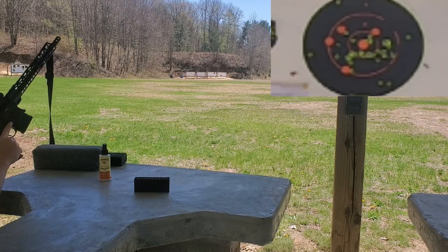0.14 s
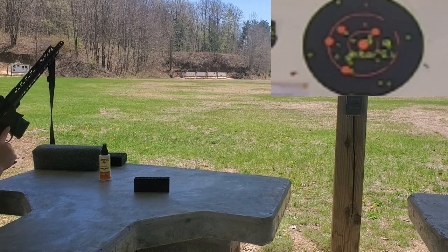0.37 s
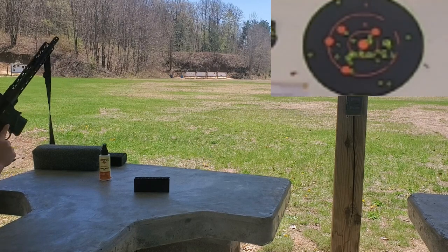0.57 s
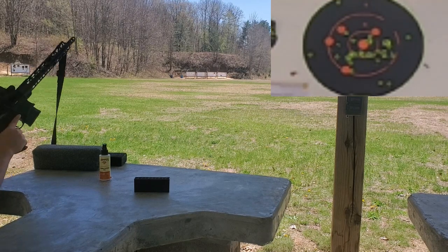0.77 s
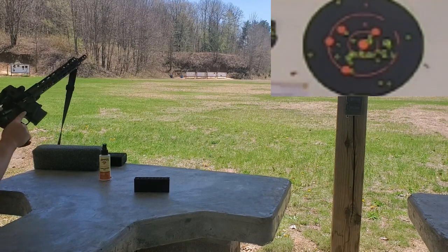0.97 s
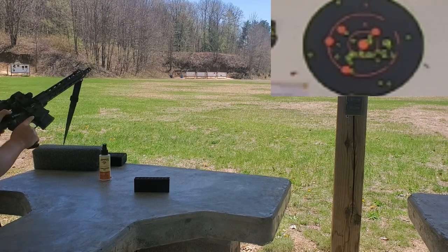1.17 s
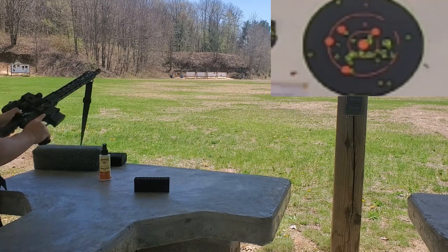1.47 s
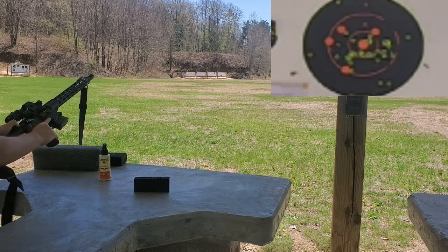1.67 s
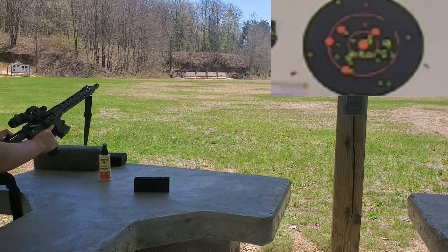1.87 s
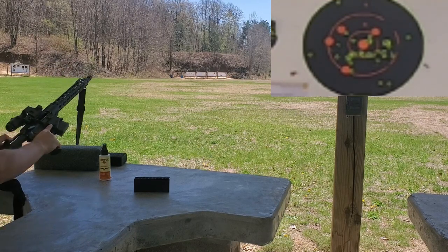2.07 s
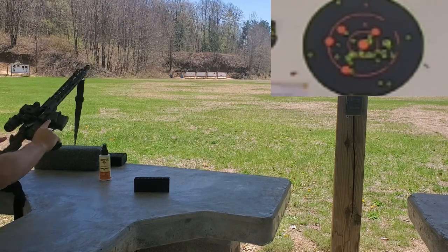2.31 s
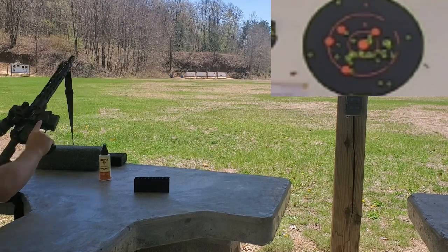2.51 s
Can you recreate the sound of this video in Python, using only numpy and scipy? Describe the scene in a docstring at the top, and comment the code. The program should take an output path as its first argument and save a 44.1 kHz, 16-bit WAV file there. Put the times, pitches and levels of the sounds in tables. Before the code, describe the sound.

A rifle is handled close by, outdoors, with a light click at the start and another at 0.3 seconds as the magazine slips out. From 1.6 seconds the handle scrapes back, clicks and hits its stop with a loud metal clack at 1.8. The bolt slams shut in a loud rattling clack around 2.4 seconds. Faint wind buffeting and cloth rustle run underneath.

```python
"""A rifle is handled at a roofed outdoor bench, close to a small stereo microphone pair: two light
clicks, the magazine slips out, the charging handle slides, unlatches and hits its stop, then the bolt
slams home in several blows. Each impact excites damped modes of the hollow body and the steel parts;
sliding friction gives a scrape, and the roof answers briefly. Wind thumps on both microphone ports,
cloth and sling rustle, and something far off hoots twice over a faint hiss."""
import sys
import numpy as np
from scipy import signal
from scipy.fft import rfft, irfft, next_fast_len
from scipy.io import wavfile
from scipy.ndimage import uniform_filter1d, map_coordinates

SR = 44100
rng = np.random.default_rng(int(sys.argv[2]) if len(sys.argv) > 2 else 0)


def transcribe(signal):
    """Save signal, clipped to [-1, 1], as a 16-bit WAV file at the path in sys.argv[1]."""
    frames = np.atleast_2d(signal).T
    limited = np.clip(frames, -1, 1)
    pcm = np.round(limited * 32767).astype(np.int16)
    wavfile.write(sys.argv[1], SR, pcm)


N = 116865
LEAD_S = .000195  # the rifle's sound reaches the left port first
SIDE = np.array([[.5], [-.5]])  # splits a level difference between left and right


def contacts():
    """Impact excitation: each metal contact rings the rifle; the hardest also thud in the stock."""
    # Contacts: t/s, ring time over that of the free ring, then level/dB in seven bands
    # (low and upper body; low, mid and high steel; low and top treble)
    impacts = [(0.0128, 1.21, -66, -41, -48.5, -43.5, -46.5, -47.5, -56),
               (0.3012, 0.65, -62, -46, -52, -33.5, -43, -39, -53),
               (0.3028, 0.74, -52, -37, -33.5, -32.5, -42, -45.5, -50),
               (0.74, 0.87, -76, -74, -64, -59, -66, -56, -64),
               (1.593, .6, -63, -42, -58, -49, -48, -47, -54),
               (1.705, 0.53, -35, -24, -20.5, -10.5, -17, -19, -20),
               (1.708, 0.58, -35, -50, -20, -7, -22, -34, -18),
               (1.776, 0.92, -32, -28, -36, -26, -44, -33, -37),
               (1.7853, 1.15, -9.5, -10, -13, -17.5, -25.5, -22.5, -15.5),
               (1.791, 0.34, -46, -7.5, -8, -30, -21, -14, -12),
               (1.797, 0.34, -27, -20, -17, -22, -42, -34, -32),
               (1.8065, 0.3, -11, -18, -19.5, -16.5, -24.5, -27, -35),
               (1.8109, 0.37, -8.5, -16, -26, -41, -28, -39, -40),
               (1.830, 0.86, -21.5, -37, -26, -51, -48, -53, -48),
               (2.326, 1.5, -42.5, -37, -47.5, -34.5, -59.5, -42, -42),
               (2.3341, 1.24, -39, -30, -30, -14, -22, -20.5, -25),
               (2.3386, 0.52, -26.5, -5, -21.5, -15.5, -17, -16, -29.5),
               (2.3422, 0.46, -23, -12, -9, -20, -24.5, -24.5, -26),
               (2.3485, 1.4, -21, -20, -27.5, -33.5, -28, -41, -35),
               (2.3561, 1.1, -15.5, -16.5, -19.5, -14.5, -24, -18, -13),
               (2.3602, 1.1, -17.5, -7, -12.5, -15.5, -16, -20.5, -21),
               (2.365, 0.57, -18, -11, -13, -16, -14, -15.5, -27),
               (2.374, 1.3, -26, -28, -24.5, -13, -11.5, -15, -16.5),
               (2.3796, 0.47, -16.5, -15.5, -11.5, -8, -9.5, -9.5, -10.5),
               (2.385, 0.55, -20.5, -17, -16, -21.5, -15, -6, -17),
               (2.392, 0.53, -20, -29, -27.5, -24.5, -15, -14.5, -24.5),
               (2.405, 0.99, -25.5, -20, -19, -35, -18.5, -24, -18.5),
               (2.429, 1.12, -30, -33, -25, -38.5, -34.5, -24.5, -32.5),
               (2.463, 0.51, -28.5, -30, -26, -26.5, -37, -42.5, -41),
               (2.489, 0.81, -38, -40, -40, -49, -45, -53, -52)]
    # Blows taken by the stock: t/s, level/dB
    thuds = [(1.808, -11), (2.378, -10.5)]
    thud_hz, thud_t60_s, thud_rise_s = 231.7, .05, .00043
    out, t = np.zeros((2, N + SR)), np.arange(SR // 8) / SR
    for start, ring_share, *levels_db in impacts:
        hit = sum(amp(db) * blow(band, t, ring_share) for band, db in enumerate(levels_db))
        lag_s = LEAD_S + .000018 * rng.standard_normal()  # parts sit at different angles
        for port, delay_s in zip(out, (0, lag_s)):
            port[round((start + delay_s) * SR):][:len(t)] += hit
    for start, db in thuds:
        envelope = amp(db - 60 * t / thud_t60_s) * (1 - np.exp(-t / thud_rise_s))
        out[:, round(start * SR):][:, :len(t)] += envelope * np.sin(2 * np.pi * thud_hz * t)
    return out[:, :N]


def blow(band, t, ring_share):
    """Modal superposition: one band of an impact is a sum of damped sinusoids plus a noise burst."""
    # Modes, from the hollow receiver up to the small steel parts: f/Hz, relative level/dB, T60/s
    modes = [(530, -9, .045), (585, 0, .055), (700, -3, .045), (790, -4, .04), (900, -2, .045),
             (1090, -2, .035), (1335, 0, .045), (1650, -4, .04), (1780, -5, .04), (1910, -3, .045),
             (1955, -3, .045), (2190, -4, .04), (2410, -4, .04), (2750, -4, .04), (3000, -4, .03),
             (3210, -1, .035), (3435, 1, .04), (3815, 0, .04), (4400, -3, .025), (4705, -6, .035),
             (5025, -4, .035), (5450, -2, .04), (5700, -2, .04), (6110, -4, .045), (6600, -3, .04),
             (8700, -4, .03), (9015, -2, .035), (9800, -2, .025), (10300, -3, .025), (11400, -7, .025),
             (12740, -2, .025), (13400, -3, .025), (14800, -6, .02)]
    # Edges of the seven bands: f/Hz
    band_edges = [490, 650, 1500, 2870, 4530, 7500, 11000, 15800]
    # Noise burst in each band: relative level/dB
    crack_db = [-9, -5, 1, -1, 2, 3, 4]
    # Its decay in each band, before scaling by ring_share: T60/s
    crack_t60 = [.025, .02, .022, .02, .022, .022, .022]
    scatter_db, detune, phase_step, attack_s = 2, .003, .03, .0006
    low, high = band_edges[band:band + 2]
    hz, db, t60 = np.transpose([m for m in modes if low < m[0] <= high])[:, :, None]
    fall = 60 * t / np.clip(ring_share, .2, 2)
    level_draw, pitch_draw = rng.standard_normal((2, len(hz), 1))
    drift = phase_step * np.cumsum(rng.standard_normal((len(hz), len(t))), 1) * np.sqrt(hz / 5000)
    phase = 2 * np.pi * hz * (1 + detune * pitch_draw) * t + drift
    envelopes = amp(db + scatter_db * level_draw - fall / t60)
    ring = (envelopes * np.sin(phase)).sum(0) / np.linalg.norm(amp(db))
    bandpass = signal.butter(4, [low, high], "band", fs=SR, output="sos")
    noise = unit(signal.sosfilt(bandpass, rng.standard_normal(len(t))))
    crack = amp(crack_db[band] - fall / crack_t60[band]) * noise
    return (ring + crack) * (1 - np.exp(-t / attack_s))


def slide():
    """Sliding friction: a part moving in its track gives grainy noise, later at the right port."""
    # Travel of the magazine, then the handle: t/s, level/dB
    travel = [(.305, -86), (.312, -51.5), (.35, -53), (.43, -76), (.5, -110), (1.575, -110), (1.594, -55),
              (1.62, -42.5), (1.645, -45.5), (1.67, -52), (1.7, -48.5), (1.712, -37.5), (1.74, -46.5),
              (1.785, -35), (1.795, -110)]
    # Friction spectrum: f/Hz, relative density level/dB
    spectrum = [(350, -35), (600, 8), (1420, -14.5), (1630, -2), (2450, -3.5), (3650, -5), (7740, -5.5),
                (13600, -12), (15800, -18.5)]
    level_db, = curves(travel)
    grit = amp(2.5 * wobble(300)[0]) * rush(spectrum, correlation=.8, patchy_db=1)[0]
    scrape = amp(level_db) * unit(grit)
    return np.array([scrape, np.roll(scrape, round(LEAD_S * SR))])


def roof(x):
    """Diffuse reflection from roof and benches: each block is convolved with a fresh noise tail."""
    # Reverberation time: f/Hz, T60/s
    decay = [(200, 0.65), (700, 0.19), (2000, 0.17), (5000, 0.28), (10000, 0.21), (15000, 0.17)]
    # Colour of the reflections: f/Hz, relative level/dB
    colour = [(200, -7.5), (700, -2), (2000, 4.9), (5000, 6.5), (10000, 5.5), (15000, 1)]
    block_s, delay_s, coherent_below_hz = .06, .005, 930
    out, step = np.zeros((2, N + SR)), int(block_s * SR)
    for i in range(0, N, step):
        block = x[i:i + step]
        if np.abs(block).max() > 1e-4:
            hz, t, noise = signal.stft(rng.standard_normal((2, SR // 2)), SR, nperseg=256)
            hz = hz[:, None]
            common = 1 / (1 + (hz / coherent_below_hz) ** 2)  # both ports hear much the same lows
            noise = np.sqrt(common) * noise[0] + np.sqrt(1 - common) * noise
            envelope = amp(along(colour, hz) - 60 * t / along(decay, hz))
            tail = signal.istft(noise * envelope, SR, nperseg=256)[1] / 40  # near unit energy
            wet = signal.fftconvolve(block[None], tail, axes=1)
            out[:, i + round(delay_s * SR):][:, :wet.shape[1]] += wet
    return out[:, :N]


def wind():
    """Turbulent pressure: low, lumpy buffeting, nearly uncorrelated between the ports."""
    # Gusts: t/s, relative level/dB, left over right/dB
    gusts = [(0.0, -33.5, -2), (0.04, -40, 2), (0.07, -53, 4), (0.13, -57, -23), (0.18, -49.5, -4),
             (0.22, -40, 1), (0.33, -40, -4), (0.39, -42.5, -12), (0.47, -48, -8.5), (0.6, -58, -31),
             (0.72, -34.5, 8), (0.78, -40.5, -12), (0.82, -35.5, -1), (0.87, -48, 4), (0.92, -57, -27),
             (0.98, -33, -3), (1.09, -52.5, -11), (1.16, -31.5, 7), (1.2, -41, -12), (1.23, -32.5, -2),
             (1.31, -48, -8), (1.36, -55.5, -36.5), (1.47, -69.5, -38), (1.5, -33.5, -7), (1.56, -65, -43),
             (1.63, -44.5, -21), (1.67, -47.5, 27), (1.7, -42, 26), (1.74, -46, -6.5), (1.88, -31.5, -4.5),
             (1.96, -44, -2), (1.98, -58.5, -28), (2.03, -40.5, -7), (2.07, -58, 29), (2.09, -41.5, 4),
             (2.27, -45.5, -1), (2.29, -38.5, -2), (2.41, -43, -0.5), (2.62, -53.5, 0), (2.65, -52, 5)]
    # Buffeting spectrum: f/Hz, relative density level/dB
    spectrum = [(12, -9.5), (20, -18), (43, 0), (75, -0.5), (124, -13), (221, -28), (271, -21),
                (300, -23.5), (390, -56), (660, -120)]
    level_db, pan_db = curves(gusts)
    lumps = unit(amp(.5 * wobble(21)) * rush(spectrum, correlation=.05, patchy_db=.1))
    return amp(level_db - 1.5 + pan_db * SIDE) * lumps


def rustle():
    """Fabric friction: moving cloth and sling give two bands of noise, stronger on the right."""
    # Movements: t/s, low-band level/dB, high-band level/dB
    movements = [(0, -58.5, -63.5), (.18, -68, -69), (.22, -60, -82), (.33, -60, -64), (.45, -62, -60.5),
                 (.55, -67.5, -75), (.72, -65, -93), (.78, -58, -61), (.86, -61.5, -64.5), (.91, -62, -72),
                 (.94, -56, -58.5), (1.0, -52, -64.5), (1.06, -61.5, -76), (1.16, -61, -81),
                 (1.21, -48.5, -67.5), (1.27, -51, -64), (1.37, -52, -61.5), (1.46, -56.5, -65.5),
                 (1.51, -56.5, -57), (1.57, -52, -60.5), (1.63, -52.5, -45.5), (1.7, -65, -52),
                 (1.78, -45, -60), (1.9, -48, -57), (2.0, -60.5, -62.5), (2.13, -59, -69.5),
                 (2.3, -59.5, -89), (2.55, -58.5, -60.5), (2.65, -111, -67)]
    # Low band of the cloth: f/Hz, relative density level/dB
    low_spectrum = [(88, -56), (150, -2.5), (227, -18.5), (429, -6.5), (728, -8), (833, -7), (1500, -18.5),
                    (1950, -20.5), (3300, -120)]
    # High band of the cloth: f/Hz, relative density level/dB
    high_spectrum = [(800, -30), (1300, 0), (2000, -7.5), (3000, -6.5), (3800, -15.5), (5200, -41),
                     (7000, -34.5), (12000, -120)]
    low_db, high_db = curves(movements)
    low = amp(low_db + 1.5 * wobble(40)) * rush(low_spectrum, correlation=.3, patchy_db=2)
    high = amp(high_db + 1.5 * wobble(40)) * rush(high_spectrum, correlation=.05, patchy_db=2)
    return amp(-3 * SIDE) * (low + high)


def hoots():
    """Harmonic tones: each distant hoot is a fundamental and its octave, wavering in level."""
    # Hoots: t/s, duration/s, f/Hz, fundamental level/dB, octave level/dB
    calls = [(0.92, 0.12, 600, -59, -59.5), (2.617, 0.035, 608, -55, -61)]
    rise_s, fall_s = .0092, .008
    out, t = np.zeros(N), np.arange(N) / SR
    for start, duration, hz, first_db, octave_db in calls:
        gate = np.clip((t - start) / rise_s, 0, 1) * np.clip((start + duration - t) / fall_s, 0, 1)
        phase = 2 * np.pi * hz * t
        out += gate * (amp(first_db) * np.sin(phase) + amp(octave_db) * np.sin(2 * phase))
    return amp(2.5 * wobble(60)) * out


def hiss():
    """Noise floor: a faint broadband hiss, nearly uncorrelated between the ports."""
    # Hiss spectrum: f/Hz, relative density level/dB
    spectrum = [(120, -43), (200, 3), (330, -9), (700, -10.5), (1300, -14), (2400, -19.5), (4500, -25),
                (5800, -18), (6800, -30.5), (7700, -35), (9000, -22), (10200, -15), (11500, -22.5),
                (12500, -27.5), (15000, -26), (15900, -28.5)]
    return amp(-61) * rush(spectrum, correlation=.027, patchy_db=-1.6)


def amp(db):
    """Amplitude ratio of a level in dB."""
    return 10 ** (np.asarray(db) / 20)


def unit(x):
    """Normalisation to rms 1."""
    return x / np.sqrt(np.mean(x ** 2) + 1e-20)


def along(points, hz):
    """Interpolation of (f/Hz, value) points on a logarithmic frequency axis."""
    f, values = np.transpose(points)
    return np.interp(np.log(hz + 1), np.log(f + 1), values)


def curves(rows):
    """Linear interpolation of each column after t/s to one value per sample."""
    times, *columns = np.transpose(rows)
    return [np.interp(np.arange(N) / SR, times, column) for column in columns]


def wobble(rate):
    """Random modulation: two spline curves with `rate` knots a second."""
    knots = rng.standard_normal((2, int(N * rate / SR) + 4))
    return np.array([map_coordinates(row, [np.arange(N) * rate / SR]) for row in knots])


def filtered(x, response):
    """Linear filtering: the spectrum of x times a frequency response."""
    size = next_fast_len(N + SR // 2)
    return irfft(rfft(x, size) * response(np.fft.rfftfreq(size, 1 / SR)), size)[..., :N]


def rush(spectrum, correlation, patchy_db):
    """Partly correlated stereo noise of rms 1, with random gain patches in time and frequency."""
    cells = signal.stft(rng.standard_normal((2, N)), nperseg=512)[2]
    patches = uniform_filter1d(uniform_filter1d(rng.standard_normal(cells.shape[1:]), 6, 0), 10, 1)
    pair = signal.istft(cells * amp(patchy_db * unit(patches)), nperseg=512)[1][:, :N]
    a, b = filtered(pair, lambda hz: amp(along(spectrum, hz)))
    angle = np.arccos(correlation) / 2
    mid, side = np.cos(angle) * a, np.sin(angle) * b
    return unit(np.array([mid + side, mid - side]))


def scene():
    """Superposition: the rifle's direct and reflected sound over wind, rustle, hoots and hiss."""
    # Level difference of the direct sound: f/Hz, left over right/dB
    pan = [(200, -2), (700, -4), (2400, -2.5), (4400, -1), (8100, .3), (15000, -.7)]
    # Microphone response to the rifle and its reflections: f/Hz, gain/dB
    microphone = [(100, -21.5), (1000, 3.28), (4200, -1), (6000, -2.5), (7600, -3.5), (9500, 0.64),
                  (15000, 3.5)]
    rifle = slide() + contacts()
    direct = filtered(rifle, lambda hz: amp(along(pan, hz) * SIDE))
    reflected = amp(-6) * roof(rifle[0])
    heard = filtered(direct + reflected, lambda hz: amp(along(microphone, hz)))
    return heard + wind() + rustle() + hoots() + hiss()


def record(dry):
    """Saturation and band limiting: peaks clip softly, then a steep low-pass cuts the top treble."""
    ceiling, hardness = .99, 8
    cutoff_hz, edge_hz = 15908, 120
    clipped = dry / (1 + np.abs(dry / ceiling) ** hardness) ** (1 / hardness)
    stop_hz = cutoff_hz + edge_hz / 2
    return filtered(clipped, lambda hz: np.sin(np.pi / 2 * np.clip((stop_hz - hz) / edge_hz, 0, 1)) ** 2)


dry = scene()
out = record(dry)
transcribe(out)
```